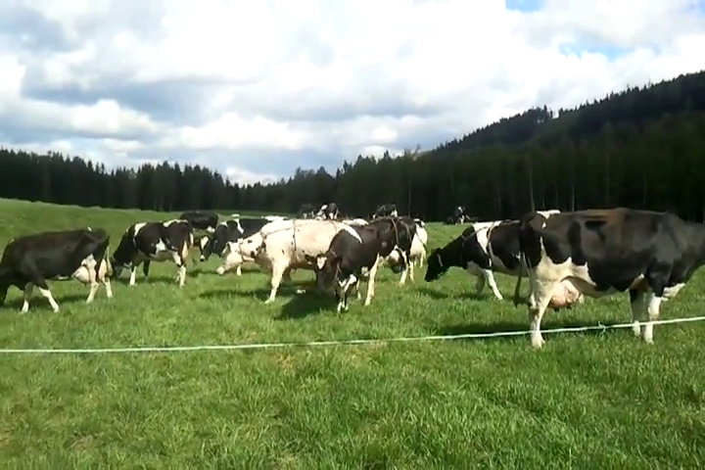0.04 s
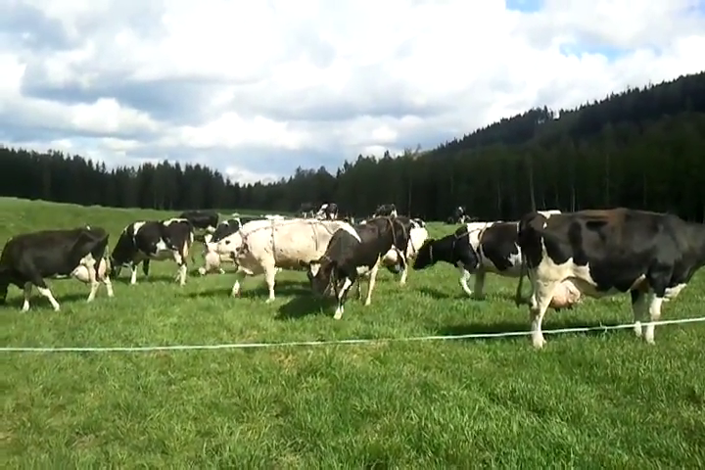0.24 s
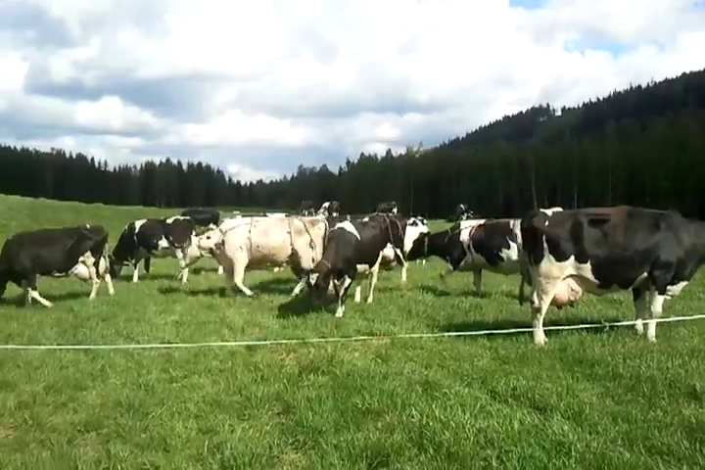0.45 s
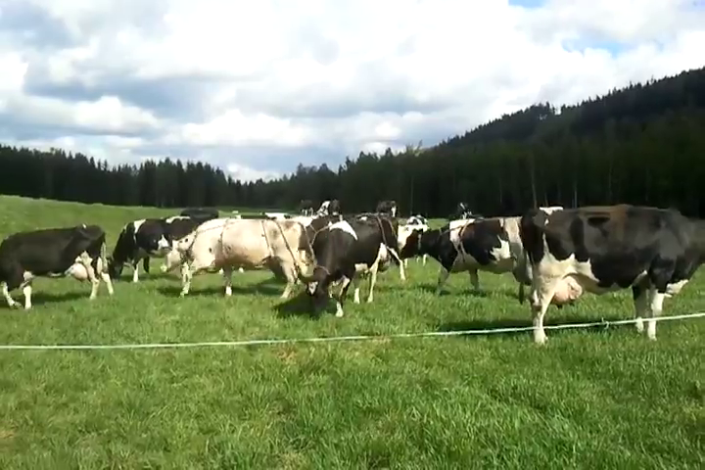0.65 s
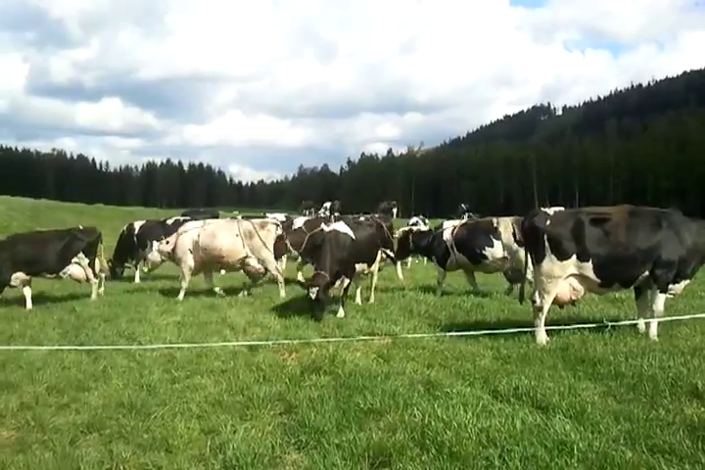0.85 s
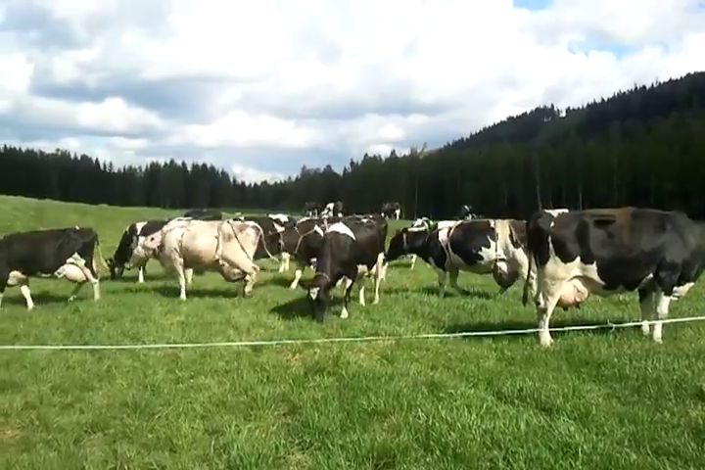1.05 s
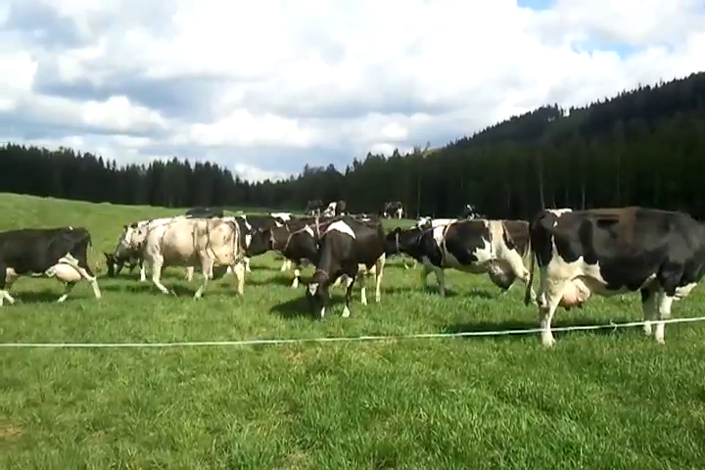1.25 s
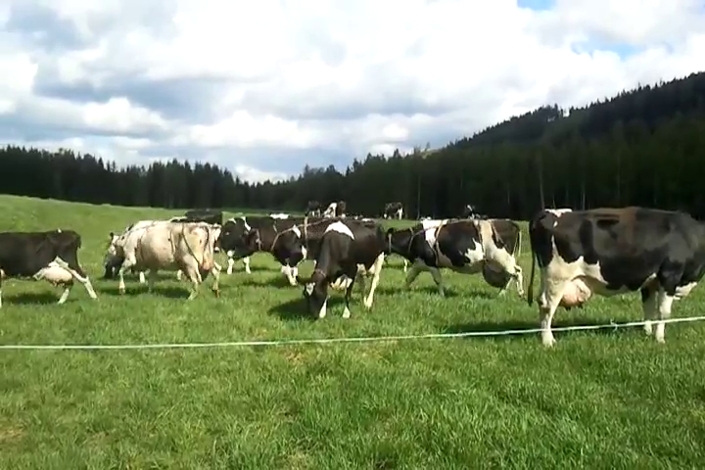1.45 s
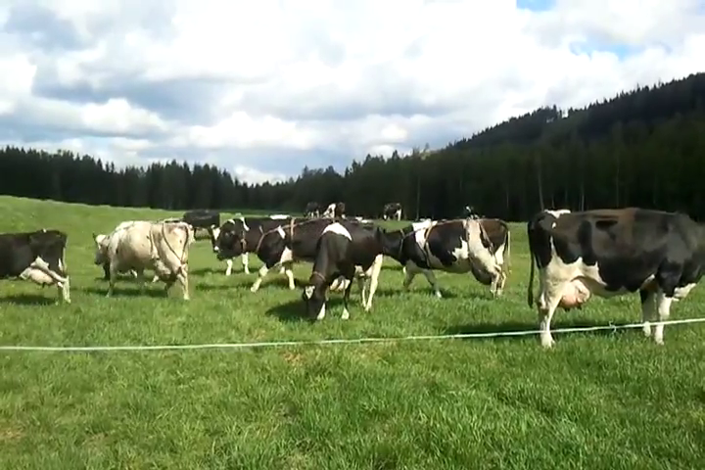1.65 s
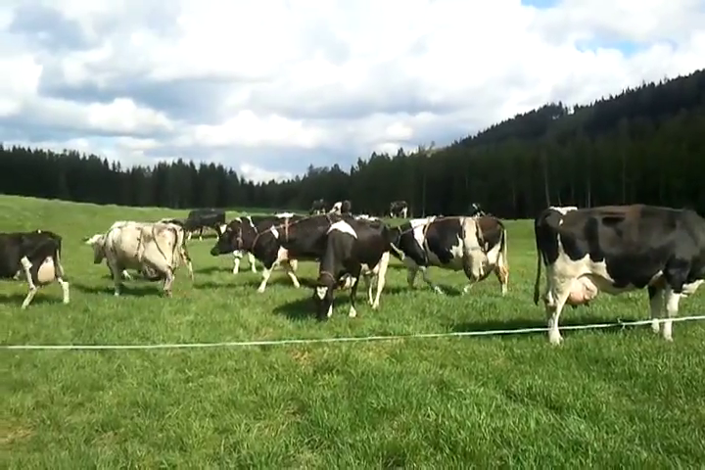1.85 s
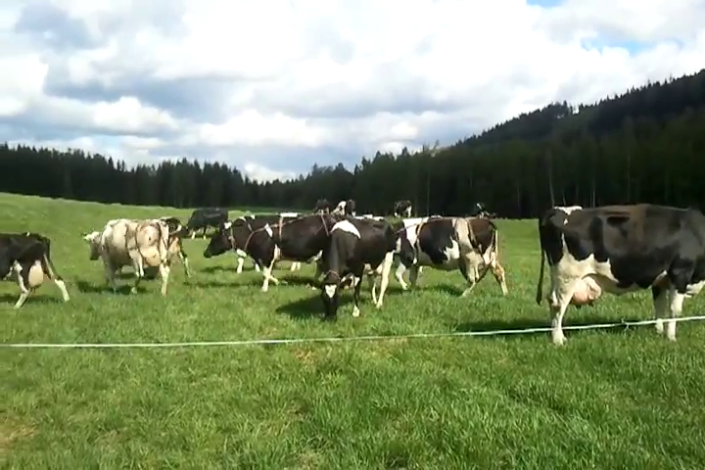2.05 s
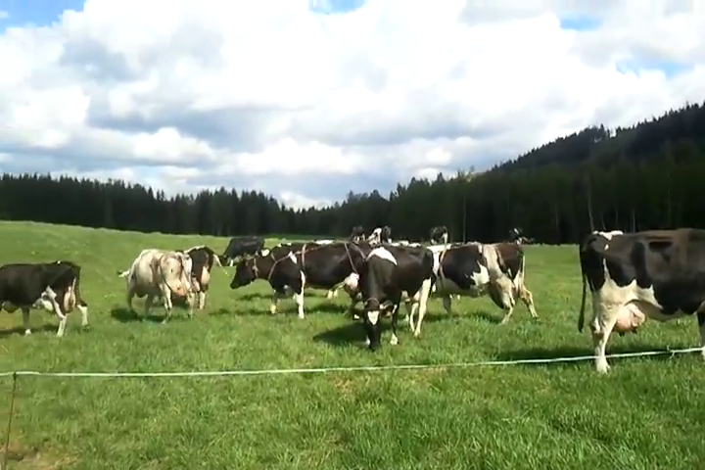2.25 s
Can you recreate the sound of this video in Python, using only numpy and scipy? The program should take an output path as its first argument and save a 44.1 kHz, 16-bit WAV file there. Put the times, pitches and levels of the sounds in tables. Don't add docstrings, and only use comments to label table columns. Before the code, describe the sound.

Irregular deep hoof thuds of a trotting cattle herd on turf, sparse at first, then denser and closest at the end; grass swishes, small knocks and faint chain clinks, soft breeze hiss, outdoors, mono microphone some metres away.

```python
import sys
import numpy as np
from scipy import signal
from scipy.fft import rfft, irfft
from scipy.io import wavfile

SR = 44100
rng = np.random.default_rng(int(sys.argv[2]) if len(sys.argv) > 2 else 0)


def waveform_to_disk(signal):
    frames = np.transpose(np.atleast_2d(signal))
    scaled = np.clip(frames, -1, 1) * 32767
    samples = np.round(scaled).astype(np.int16)
    wavfile.write(sys.argv[1], SR, samples)


def rack_gain(trim_db):
    fader = np.asarray(trim_db, float)
    return 10 ** (fader / 20)


N = 102135


def in_time(rows):
    s, db = np.transpose(rows)
    return np.interp(np.arange(N) / SR, s, db)


def rms_one(x):
    return x / np.sqrt(np.mean(x ** 2) + 1e-20)


def drift(rate):
    hold = 40
    r = np.exp(-2 * hold * np.pi * rate / SR)
    slow = signal.lfilter([1], [1, -2 * r, r * r], rng.standard_normal(N // hold + 2002))[2000:]
    return np.interp(np.arange(N) / hold, np.arange(len(slow)), rms_one(slow))


def coloured(x, spectrum, patchy_db, low_hz):
    hz = np.maximum(np.arange(N // 2 + 1) * SR / N, 1)
    at, db = np.transpose(spectrum)
    inside = (hz > low_hz) * (hz < 1.05 * at[-1])
    shaped = rfft(x) * rack_gain(np.interp(np.log(hz), np.log(at), db)) * inside
    place = 2 * np.log2(hz / low_hz)
    out = np.zeros(N)
    for k in range(int(2 * np.log2(at[-1] / low_hz)) + 2):
        band = irfft(shaped * np.clip(1 - abs(place - k), 0, 1), N)
        out += rack_gain(patchy_db * drift(9.2)) * band
    return rms_one(out)


def add(out, s, lead_s, shape):
    at = np.arange(max(int((s - lead_s) * SR), 0), min(int((s + .2) * SR), N))
    out[at] += shape(at / SR - s)


def rumble():
    # time in seconds, level in dB.
    herd = [
        (0, -46),
        (.4, -42.5),
        (.7, -40),
        (1.0, -44),
        (1.3, -37.5),
        (1.7, -37.5),
        (2.0, -37.5),
        (2.32, -32.5),
    ]
    # frequency in Hz, level in dB per Hz.
    ground_tone = [(12, -36), (20, 3.5), (32, 2.5), (55, -5.5), (90, -6), (146, -17.5), (260, -30),
                   (340, -47.5)]
    lumps_db = 3 * drift(7.1)
    noise = coloured(rng.standard_normal(N), ground_tone, patchy_db=0.41, low_hz=8.3)
    return rack_gain(in_time(herd) + 0.5 + lumps_db) * noise


def air():
    # time in seconds, level in dB.
    breeze = [
        (0, -45),
        (.15, -46.5),
        (.4, -45.5),
        (.9, -45),
        (1.3, -44.5),
        (1.5, -45),
        (1.9, -43.5),
        (2.32, -45),
    ]
    # frequency in Hz, level in dB per Hz.
    hiss_tone = [(100, -31), (150, -3.5), (380, -6.5), (900, -8), (1700, -10), (2700, -19.5), (6700, -17.5),
                 (8000, -23)]
    hiss = coloured(rng.standard_normal(N), hiss_tone, patchy_db=1.0, low_hz=100)
    gusts_db = .5 * drift(9.6)
    return rack_gain(in_time(breeze) + gusts_db) * hiss


def heave(turn, cycles, lead):
    crest_share = 0.065
    lean = 0.26
    spread = 0.33
    angle = 2 * np.pi * turn
    w = angle + np.sign(lead) * lean * (np.cos(angle) - 1)
    wave = (np.cos(w) + crest_share * np.cos(2 * w)) / (1 + crest_share)
    return wave * np.exp(-.5 * ((turn + lead) / (spread * cycles)) ** 2)


def thuds():
    # crest in seconds, its level in dB, turf pitch in Hz, length in cycles. Hoof
    hoof_falls = [(0.491, -25.5, 46, 0.63), (.5815, -29.5, 42, 1), (0.635, -13, 72.5, 1.3),
                  (0.6522, -12.5, 87, 0.69), (0.67, -20.5, 65, 1.9), (.757, -25.5, 81, 0.77),
                  (.857, -31, 61, 2.2), (1.094, -23, 80, 0.95), (1.11, -23.5, 80, 1.6),
                  (1.1865, -26, 94, 1.3), (1.209, -31, 70, 1.1), (1.238, -26.5, 75, 1.4),
                  (1.2475, -39, 90, 1), (1.263, -31, 55, 1.8), (1.3476, -16.5, 97, 0.75),
                  (1.462, -16, 53.4, 1.3), (1.484, -23.5, 70, 2.3), (1.5628, -26, 58, 2.1),
                  (1.495, -36, 80, 1.2), (1.871, -17.5, 45, 1.2), (1.9195, -19, 83, 1.86),
                  (2.0457, -30, 42, 3), (2.1561, -15, 67.5, 1.7), (2.179, -23, 75, 1.6),
                  (2.1895, -18.5, 90, 1.7), (2.217, -17, 74, 1.3), (2.2416, -18, 78, 0.95),
                  (2.2658, -13.5, 66.7, 1.08), (2.2881, -13, 61, 0.91), (2.304, -12, 100, 1.3)]
    more_hoof_falls = [(.005, -35.5, 51, 0.99), (0.037, -35.5, 159, 2.1), (.32, -40, 40, 1.2),
                       (0.397, -38, 60.3, 1.2), (.606, -29.5, 69.6, 1.02), (0.513, -28, 89, 1.1),
                       (0.537, -33, 70, 1.1), (0.768, -29, 60.7, 0.42), (0.842, -30, 49.7, 0.62),
                       (0.898, -35, 68.4, 0.75), (1.03, -39, 59.4, 1.8), (1.222, -28, 70, 0.85),
                       (1.322, -40, 50.4, 1.5), (1.359, -25, 80, 0.62), (1.3893, -27, 65, 1.9),
                       (1.438, -31, 210, 2.7), (1.5053, -27.5, 81, 2), (2.035, -38, 105, 1.5),
                       (1.598, -27, 49.5, 0.95), (1.671, -36, 49.3, 2.1), (1.744, -36, 113, 1.8),
                       (1.8427, -33, 40.3, 1.16), (1.885, -25, 93, 1.3), (1.906, -30.5, 70, 3.3),
                       (1.986, -29, 54.4, 1.3), (2.0698, -31, 54, 1.4), (2.126, -22, 69, 1.5),
                       (2.005, -34, 100, 1.3), (2.083, -34, 85, 1.1)]
    stamps = [(.461, -28, 62, 0.75), (.566, -28, 62.4, 1.3), (.591, -31, 65.6, 1.4), (.8015, -21, 58, 1.3),
              (1.1645, -22.5, 75, 0.74), (1.175, -16, 88, 1.25), (1.1955, -18, 72, 0.89),
              (1.405, -27, 55.2, 2.1), (1.4235, -18, 52.2, 2.15), (1.441, -18, 65, 1.3),
              (1.6435, -23, 84.5, 1.1), (1.695, -37, 90, 0.85), (1.78, -21, 100, 0.99),
              (1.809, -23, 61, 0.96), (1.874, -18.5, 75, 1.1), (.2, -40, 152, 2), (2.102, -26, 50, 1.2),
              (2.141, -24.5, 62, 0.59), (.88, -36, 159, 2.3), (1.965, -49, 170, 2.1),
              (.467, -37.5, 165, 1.5), (1.47, -37, 205, 4.9), (1.835, -40, 149, 3.1),
              (2.109, -31.5, 170, 1.7)]
    out = np.zeros(N)
    for rows, lead in (hoof_falls, 0.07), (more_hoof_falls, 0.07), (stamps, -0.15):
        for s, db, hz, cycles in rows:
            add(out, s, .2, lambda t: rack_gain(db) * heave(t * hz, cycles, lead))
    return out


def swishes():
    # middle in seconds, length in seconds, level in dB.
    strokes = [(0.237, 0.042, -49), (0.355, 0.0075, -47), (0.403, 0.027, -46.5), (0.467, 0.078, -51.5),
               (.474, 0.01, -49), (0.545, 0.033, -49.5), (0.634, 0.11, -52), (0.784, 0.029, -47),
               (0.922, 0.051, -55.5), (1.092, 0.13, -52), (1.107, 0.0079, -43.5), (1.145, 0.0027, -39),
               (1.23, 0.065, -44.5), (1.417, 0.01, -48.5), (1.424, 0.13, -48), (1.54, 0.013, -62),
               (1.618, 0.061, -52.5), (1.667, 0.006, -41.5), (1.646, 0.0088, -48), (1.604, 0.0092, -52),
               (1.327, 0.022, -50.5), (1.528, 0.006, -50), (1.738, 0.053, -45), (1.828, 0.11, -46.5),
               (1.906, 0.011, -49.5), (2.076, 0.024, -43), (2.134, 0.23, -54)]
    # frequency in Hz, level in dB per Hz.
    blade_tone = [(900, -5), (2500, -6.5), (4000, -1.5), (6500, 3), (8000, -1)]
    blades_per_s, blade_spread_db = 8000, 2.6
    t = np.arange(N) / SR
    stroke_power = np.zeros(N)
    for s, length, db in strokes:
        stroke_power += rack_gain(2 * db) * np.exp(-abs(2 * (t - s) / length) ** 3.5)
    sizes = rack_gain(blade_spread_db * np.minimum(rng.exponential(1, N), 4)) * rng.choice([-1, 1], N)
    ticks = sizes * (rng.random(N) < blades_per_s / SR)
    return np.sqrt(stroke_power) * coloured(ticks, blade_tone, patchy_db=0.91, low_hz=760)


def ring(t, db, hz, t60, choke_s=1):
    t = np.maximum(t, 0)
    contact = 1 - np.exp(-t / .00022)
    choke = np.exp(-(t / choke_s) ** 4.5)
    return -rack_gain(db - 60 * t / t60) * np.sin(2 * np.pi * hz * t) * choke * contact


def clinks():
    # time in seconds, peak level in dB, pitch in Hz, time to fall 60 dB in seconds.
    touches = [(.35, -47.5, 7630, 0.021), (0.453, -36, 5870, .008), (0.4754, -37, 6440, 0.021),
               (1.0573, -42.5, 7400, 0.1), (1.0819, -37.5, 7100, 0.19), (1.1442, -34.5, 6500, 0.022),
               (1.1438, -44, 8000, 0.014), (1.201, -38, 4510, 0.024), (1.209, -46, 7850, 0.036),
               (1.6645, -32, 5200, 0.0085), (1.6648, -36.5, 6900, .006), (1.6683, -37, 6300, 0.0067),
               (1.812, -47, 6220, 0.031), (1.8916, -40, 7160, 0.041), (1.6684, -39.5, 7600, 0.005)]
    out = np.zeros(N)
    for s, db, hz, t60 in touches:
        add(out, s, 0, lambda t: ring(t, db, hz, t60, choke_s=.022))
    rattle_db = 1.5 * drift(150)
    return out * rack_gain(rattle_db)


def knocks():
    # time in seconds, ring level in dB, pitch in Hz, crack level in dB, ring length in seconds.
    tips = [(0.389, -32, 1730, -41, 0.0037), (0.5987, -28, 1590, -50, 0.0029),
            (0.625, -37, 1570, -43, .003), (0.771, -35, 1100, -38, 0.0026), (0.93, -38, 1720, -41, .003),
            (1.0291, -29.5, 1480, -35, 0.0016), (1.0292, -35.5, 4000, -54, 0.00089),
            (1.0305, -32.5, 1500, -52, .0015), (1.1428, -32, 1310, -39, .003),
            (1.1785, -30.5, 910, -34, .003), (1.4096, -26, 1780, -22.5, 0.0022),
            (1.4093, -29.5, 4050, -40.5, 0.0011), (1.4099, -26, 3000, -25.5, 0.00083),
            (1.411, -31, 1310, -41.5, 0.0023), (1.431, -31, 1390, -44, 0.0011),
            (1.693, -37, 1800, -54, .003), (1.869, -34.5, 4000, -47, 0.00089),
            (1.881, -30.5, 940, -51, 0.0054), (2.053, -31.5, 1104, -29, 0.0023),
            (2.0548, -29, 1600, -42, 0.0013), (2.1105, -34, 1170, -35, .0024),
            (2.1113, -23.5, 1160, -28.5, .0017)]
    # ratio to the ring pitch, level in dB.
    crack_tones = [(.2, 0), (.45, -7.5), (.75, -8.5), (1.4, -1)]

    def knock(t, db, hz, crack_db, length):
        out = ring(t, db, hz, .022, length)
        for ratio, rel_db in crack_tones:
            out = out + ring(t, crack_db + rel_db, hz * ratio, .005)
        return out

    out = np.zeros(N)
    for s, *strike in tips:
        add(out, s, 0, lambda t: knock(t, *strike))
    return out


def scene():
    return (rumble() + air() + thuds() + swishes() + clinks() + knocks())[None]


def low_pass(x):
    return signal.sosfilt(signal.butter(12, 9910, fs=SR, output="sos"), x)


def record(dry):
    # frequency in Hz, level in dB.
    leaky_filter = [(6000, 0), (7200, 0.5), (8000, 1.5), (8900, -13), (9600, -26.5), (10200, -44.5)]
    fold_hz = 8000
    hz = np.arange(N // 2 + 1) * SR / N
    at, db = np.transpose(leaky_filter)
    low = irfft(rfft(dry) * (hz < fold_hz), N)
    mirrored = low * (1 + 2 * np.cos(2 * np.pi * 2 * fold_hz * np.arange(N) / SR))
    leaked = irfft(rfft(mirrored) * rack_gain(np.interp(hz, at, db, right=-120)), N)
    return low_pass(leaked)


dry = scene()
out = record(dry)
waveform_to_disk(out)
```